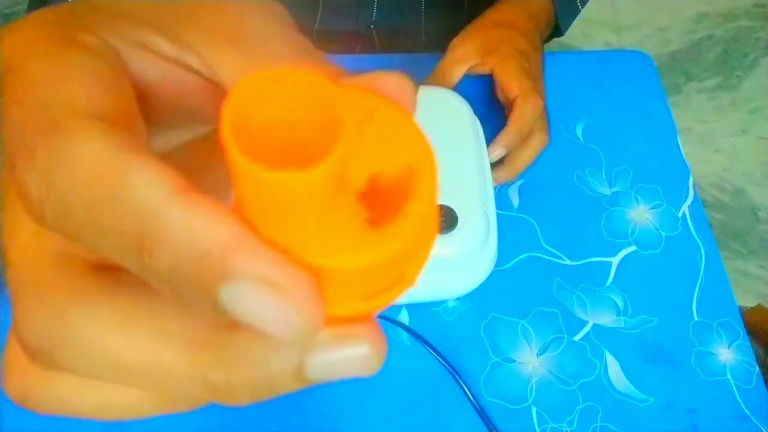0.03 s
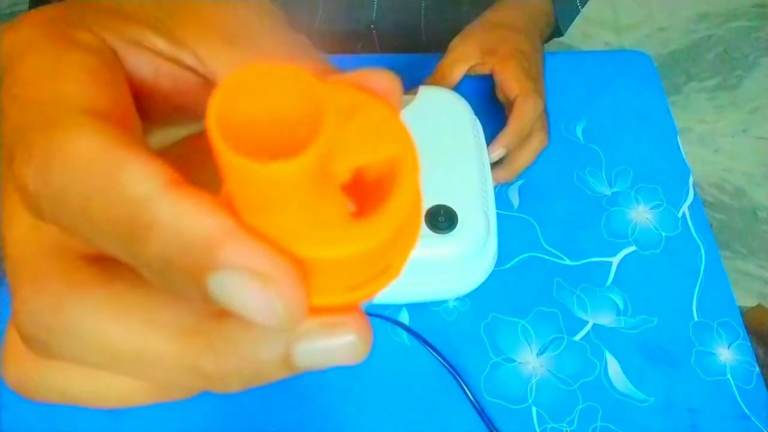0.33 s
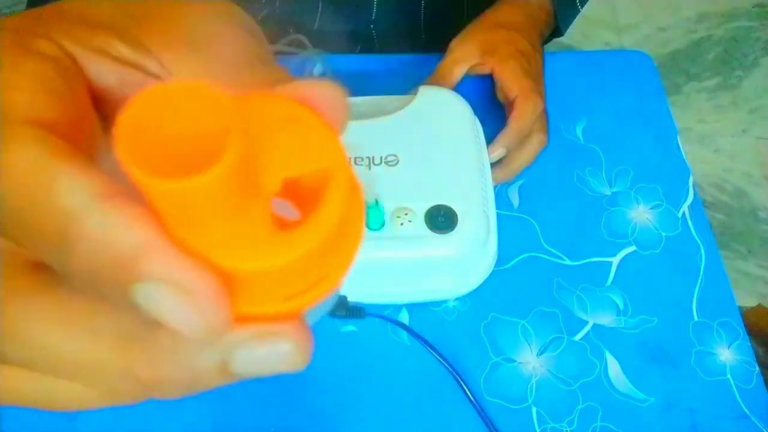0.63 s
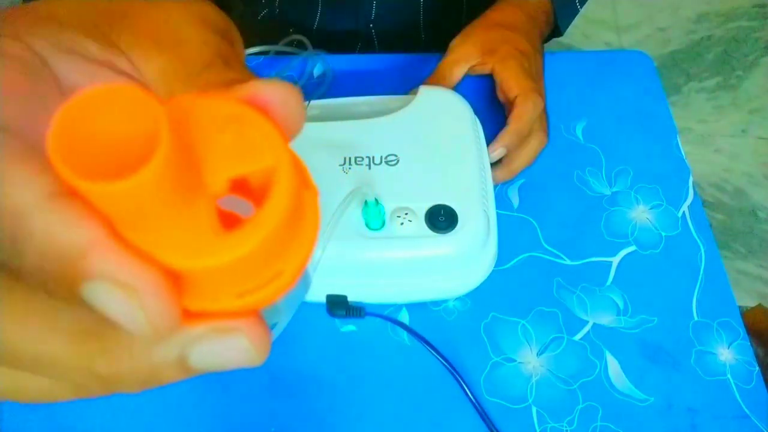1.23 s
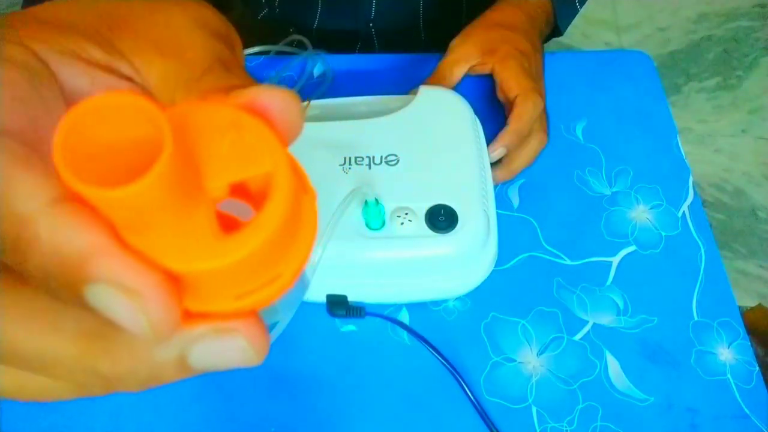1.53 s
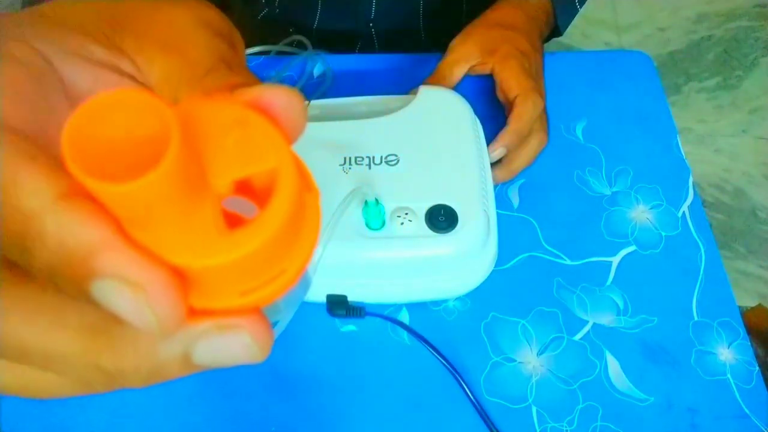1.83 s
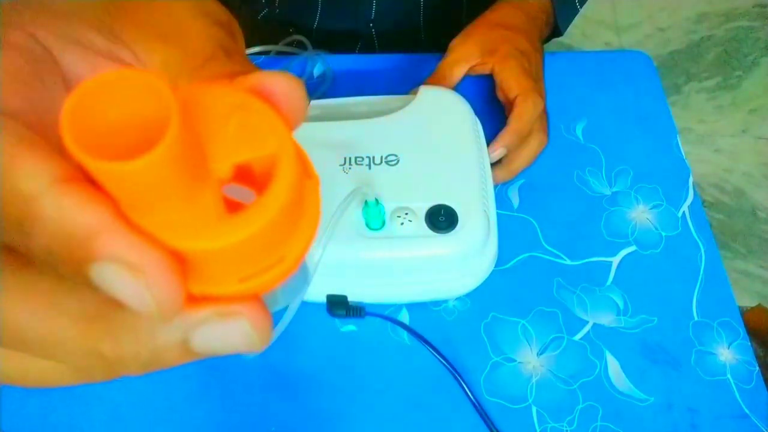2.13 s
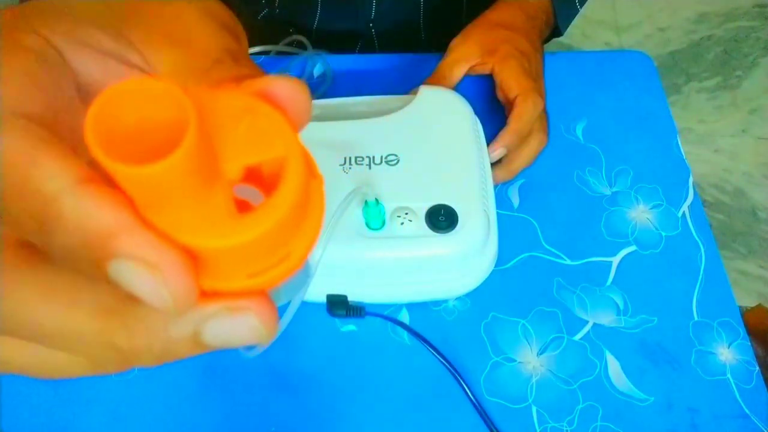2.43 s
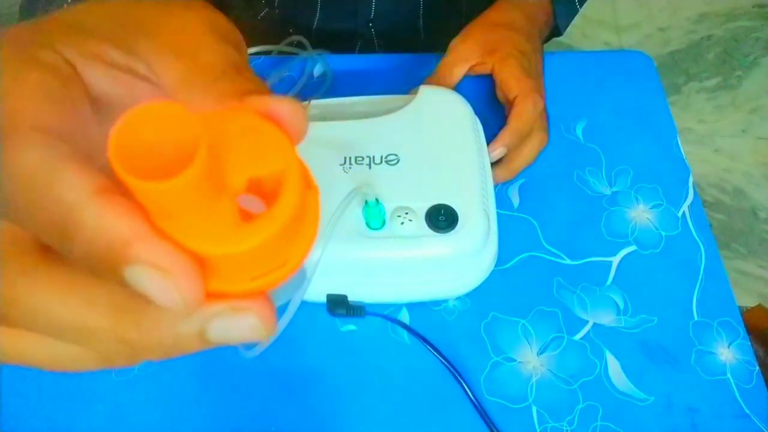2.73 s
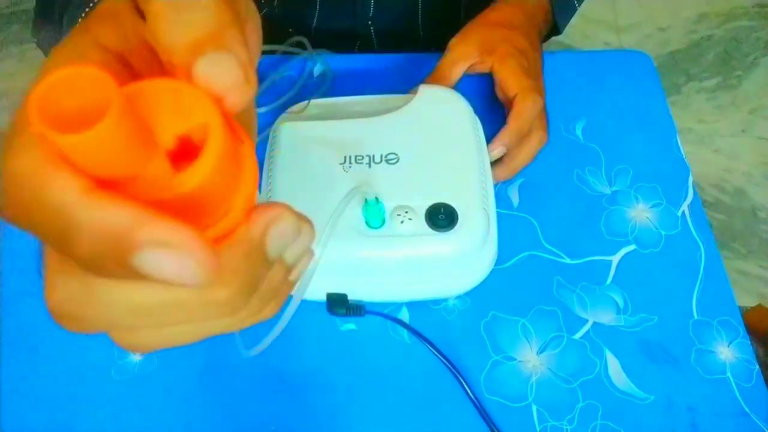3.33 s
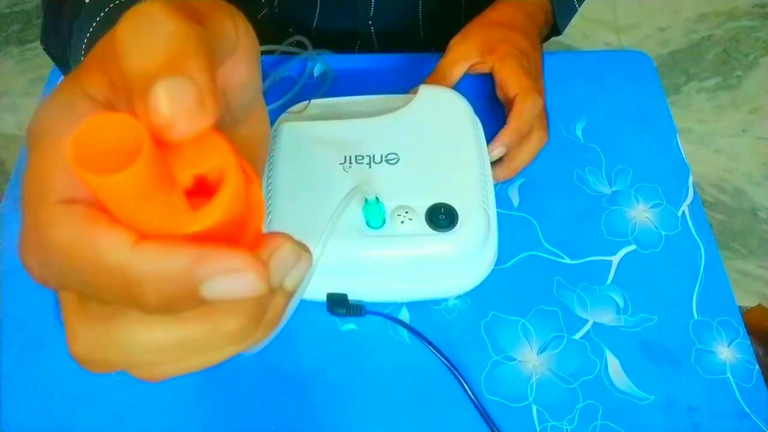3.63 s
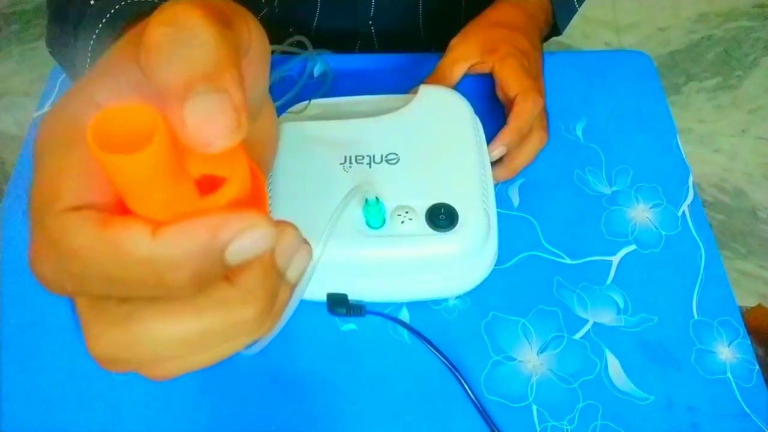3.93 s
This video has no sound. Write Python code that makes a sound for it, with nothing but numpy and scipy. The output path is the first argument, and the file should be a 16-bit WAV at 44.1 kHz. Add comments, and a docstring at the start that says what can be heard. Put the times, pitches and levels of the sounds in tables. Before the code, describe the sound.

Steady rattling drone of a small nebulizer pump, with air hissing thinly through its cup.

```python
"""A fast, rattling knock over a motor drone: a nebulizer's small piston compressor on a table indoors.
The pump chugs once in every turn of the shaft, a double knock that rings its plastic case, while the
motor hums and its fan rushes. Air hisses and whistles through the jet of the medicine cup, which a hand
holds close and slowly tilts, shifting the colour of the hiss."""
import sys
import numpy as np
from scipy import signal
from scipy.fft import rfft, irfft
from scipy.io import wavfile
from scipy.ndimage import uniform_filter1d

SR = 44100
rng = np.random.default_rng(int(sys.argv[2]) if len(sys.argv) > 2 else 0)


def unload_audio(sound):
    """Save the sound as a 16-bit wav file, at the path given as the first command line argument."""
    columns = np.transpose(np.atleast_2d(sound))
    # keep every value between -1 and 1, then stretch to whole-number steps
    steps = np.round(np.clip(columns, -1, 1) * 32767)
    wavfile.write(sys.argv[1], SR, steps.astype(np.int16))


N = 176400
TIME = np.arange(N) / SR
SHAFT_HZ, WHISTLE_HZ = 45.157, 4870

# the hand's move with the cup: time_s, tilt (0 upright, 1 tilted), hiss_db
CUP_MOVE = [(0, 0, -1), (0.499, 0, -2.5), (1.001, 0.04, -1.5), (1.5, 0.1, -3), (2, 0.31, -2.5),
            (2.351, 0.52, -2.5), (2.7, 0.8, -2.5), (3, 0.97, -4), (3.299, .95, -1.5), (3.6, 1, -3.5),
            (4, 0.6, -6)]
# rise and fall of the cup's main whistle and the hiss around it: time_s, gain_db
WHISTLE_RIDE = [(0, 0), (1.1, 1), (1.8, -1.5), (2.3, -3.5), (2.75, -5.5), (2.92, 2.5), (3.3, -0.5),
                (3.5, -4.5), (3.8, -1.5), (4, -3)]


def amp(db):
    """Decibels to gain."""
    return 10 ** (np.asarray(db) / 20)


def unit(x):
    """Scales to rms 1."""
    return x / np.sqrt(np.mean(abs(x) ** 2) + 1e-20)


def eq_db(curve, hz):
    """Level of an EQ curve at hz, on a log-frequency axis."""
    freq_hz, db = np.transpose(curve)
    return np.interp(np.log(hz + 1), np.log(freq_hz), db)


def wander(hz):
    """Smooth random modulation of rms 1, rolling off above hz."""
    freq_hz = np.fft.rfftfreq(N, 1 / SR)
    return unit(irfft(rfft(rng.standard_normal(N)) / np.sqrt(1 + (freq_hz / hz) ** 4), N))


def eq_impulse(curve, size=4096):
    """Minimum-phase impulse response of an EQ curve."""
    log_gain = np.log(amp(eq_db(curve, abs(np.fft.fftfreq(size, 1 / SR)))))
    return np.fft.ifft(np.exp(np.conj(signal.hilbert(log_gain)))).real[:size // 2]


def clicks(times, gains):
    """A train of one-sample clicks."""
    at = np.round(times * SR).astype(int)
    inside = (at >= 0) & (at < N)
    return np.bincount(at[inside], gains[inside], N)


def pump_rhythm():
    """One chug a turn: the pump holds its beat for a short run, then slips to another place in the turn."""
    # runs of steady chugs: start_s, level_db
    runs = [(0.009, -3.7), (0.0574, -3.4), (0.0878, -4.0), (0.1723, 0.5), (0.2263, 0.6), (0.3314, -0.3),
            (0.4145, -0.6), (0.4768, -2.7), (0.4934, 2.1), (0.5875, 1.0), (0.773, -1.9), (0.9363, 0.6),
            (1.0304, 1.3), (1.1674, -3.0), (1.3986, 1.3), (1.4761, 2.3), (1.5383, 1.8), (1.6601, 1.6),
            (1.7598, 0.9), (1.8221, -4.7), (1.8387, -1.7), (1.9674, -0.5), (1.9854, -0.8), (2.0241, -0.8),
            (2.1183, -0.6), (2.247, 0.9), (2.3079, 1.2), (2.3798, 0.8), (2.5362, -0.4), (2.7452, -0.1),
            (2.8615, 0.4), (3.0041, -1.5), (3.1881, -5.5), (3.2864, -3.4), (3.4525, -0.9), (3.5743, 0.6),
            (3.6366, -4.2), (3.6532, -0.7), (3.7501, 0.0), (3.7764, -0.4), (3.8151, -1.0), (3.9106, -1.5)]
    # lags of a stray rattle behind the main knock, one picked for each run: delay_s
    stray_delays = [.0069, .0083, .0111, .0125, .0138, .0152, .018]
    # single chugs that hit harder: time_s, boost_db
    accents = [(0.273, 3.5), (0.354, 2.5), (0.376, 3), (0.46, 5), (0.54, 2.5), (0.634, 7), (1.077, 2),
               (1.26, 2), (1.445, 4), (1.706, 2), (2.33, 1.5), (2.426, 3)]
    turn_s = 1 / SHAFT_HZ
    chugs = []
    for (start, db), (end, _) in zip(runs, runs[1:] + [(N / SR + turn_s, 0)]):
        stray_s = rng.choice(stray_delays)
        chugs += [(at, db, stray_s) for at in np.arange(start, end - turn_s / 2, turn_s)]
    chug_s, chug_db, stray_s = np.transpose(chugs)
    for at, boost_db in accents:
        chug_db[np.argmin(abs(chug_s - at))] += boost_db
    return chug_s, chug_db, stray_s


def case_ring(size=4096):
    """The plastic case answers a knock with a short pulse that swells and dies, treble slightly late."""
    # colour of the case: freq_hz, level_db
    case_eq = [(40, -60), (90, -55), (135, -33.5), (180, -20.5), (226, -12), (271, -16), (318, 1.5),
               (361, -8), (406, -3.5), (452, 4), (497, 1.5), (542, -1), (587, -8), (632, -13), (680, 3),
               (722, -6.5), (768, -19.5), (830, -21.5), (903, -12.5), (948, -6), (1000, -29), (1084, -11),
               (1190, -19), (1265, -26.5), (1400, -21), (1570, -32), (1725, -22), (2000, -27), (2160, -28),
               (3000, -39.5), (6000, -42), (12000, -70.5)]
    smear_s_per_hz, on_time_hz = 7e-7, 722
    hz = np.fft.rfftfreq(size, 1 / SR)
    smear = np.exp(-1j * np.pi * smear_s_per_hz * (hz - on_time_hz) ** 2)
    return np.fft.fftshift(irfft(amp(eq_db(case_eq, hz)) * smear))


def pump_knocks(chug_s, chug_db, stray_s):
    """Each chug is a double knock with lighter rattles around it; together they ring the case."""
    # hits of one chug, timed from its main knock: offset_s, level_db
    hits = [(-.00554, -11), (0, 0), (.00415, -1), (.00554, -9), (.0097, -10)]
    stray_db, jitter_s, uneven_db = -10, .00005, 1.3
    train = np.zeros(N)
    for offset_s, hit_db in hits + [(stray_s, stray_db)]:
        late, force = rng.standard_normal((len(chug_s), 2)).T
        gains = amp(chug_db + hit_db + uneven_db * np.tanh(force))
        train += clicks(chug_s + offset_s + jitter_s * late, gains)
    return amp(-46.2) * unit(signal.oaconvolve(train, case_ring(), "same"))


def airflow(chug_s, width_s=.005):
    """Swell of the pumped air, from -1 to 1, cresting just after each main knock."""
    nearest_s = chug_s[np.searchsorted((chug_s[1:] + chug_s[:-1]) / 2, TIME)]
    return 2 * np.exp(-((TIME - nearest_s - width_s / 2) / width_s) ** 2) - 1


def motor_drone(waver_hz=5.6):
    """Harmonics of the shaft speed, each part steady and part wavering."""
    # partials of the motor: shaft_harmonic, level_db, waver (0 steady, 1 all wavering)
    partials = [(5, -68, 0.4), (7, -61, 1), (11, -57, 0.8), (12, -55, 0.47), (21, -62.5, 1),
                (26, -72.5, 0.4), (27, -68.5, 0.6)]
    drone = np.zeros(N)
    for harmonic, db, waver in partials:
        drift = unit(wander(waver_hz) + 1j * wander(waver_hz))
        tone = np.exp(2j * np.pi * (harmonic * SHAFT_HZ * TIME + rng.random()))
        modulation = np.sqrt(1 - waver ** 2) + waver * drift
        drone += amp(db) * unit((modulation * tone).real)
    return drone


def motor_hum(harmonic=16, throb_hz=11.15, throb_db=4):
    """The motor's firm main tone, locked to the shaft speed and throbbing."""
    throb = amp(throb_db * np.sin(2 * np.pi * (throb_hz * TIME + rng.random())))
    return amp(-50.5) * unit(-throb * np.cos(2 * np.pi * harmonic * SHAFT_HZ * TIME))


def fan_rush(swell, pulse_db=1, flutter_db=1.46):
    """Fluttering air noise of the motor and its fan, pulsing with the pump."""
    # colour of the rush: freq_hz, level_db
    rush_eq = [(25, -41), (70, -41.5), (100, -37), (140, -22.5), (185, -2.5), (300, 5), (560, 3.5),
               (750, 4.5), (840, -8.5), (1000, -1), (1230, -4.5), (1400, -14), (1570, -11), (1725, -8.5),
               (2000, -13.5), (2160, -11), (3000, -25), (5000, -36.5), (12000, -67)]
    air = rng.standard_normal(N) * amp(pulse_db * swell + flutter_db * wander(hz=26))
    return amp(-49.5) * unit(signal.oaconvolve(air, eq_impulse(rush_eq))[:N])


def bell(hz, centre_hz, width_hz):
    """A bell-shaped EQ band of height 1, as a column over frequency."""
    return np.exp(-2 * ((hz[:, None] - centre_hz) / width_hz) ** 2)


def jet_hiss(shimmer_db=2, sputter_db=1.33):
    """The air jet hisses through the cup, whose resonances change in strength as it tilts."""
    # colour of the bare jet: freq_hz, level_db
    jet_eq = [(500, -38.5), (2000, -18), (3000, -10), (4500, 1.5), (5200, -7), (5750, -11.5), (6600, -9),
              (7000, -10.5), (7700, -18), (8150, -27.5), (9300, -31), (11500, -35.5), (15000, -40)]
    # resonances of the cup: centre_hz, width_hz, upright_db, tilted_db
    resonances = [(3562, 52, 13, 2.5), (4135, 210, 1.5, 8.5), (4755, 150, 10.5, 4), (6900, 210, -4, -4),
                  (5230, 160, 6, 4.5), (6180, 430, 4, 4.5), (7500, 670, 1, -6), (8590, 400, 4.5, 9.5),
                  (10550, 490, 5, 4)]
    hz, frame_s, noise = signal.stft(rng.standard_normal(N), SR, nperseg=1024, noverlap=768)
    move_s, tilts, hiss_db = np.transpose(CUP_MOVE)
    tilt = np.interp(frame_s, move_s, tilts)
    colour_db = eq_db(jet_eq, hz)[:, None] + np.interp(frame_s, move_s, hiss_db)
    for centre_hz, width_hz, upright_db, tilted_db in resonances:
        colour_db += bell(hz, centre_hz, width_hz) * (upright_db + (tilted_db - upright_db) * tilt)
    colour_db += bell(hz, WHISTLE_HZ, width_hz=170) * np.interp(frame_s, *np.transpose(WHISTLE_RIDE))
    # small random patches of the spectrum brighten and fade
    patches = uniform_filter1d(rng.standard_normal(noise.shape), size=4, axis=0)
    colour_db += shimmer_db * unit(uniform_filter1d(patches, size=16, axis=1))
    hiss = signal.istft(noise * amp(colour_db), nperseg=1024, noverlap=768)[1][:N]
    return amp(-59.5) * unit(hiss * amp(sputter_db * wander(hz=49.6)))


def warble(hz, swing_hz, level_db, flicker_db=4.5, rough_db=3.5):
    """A thin, rough tone that slides about its pitch and breaks into short flickers."""
    pitch_hz = hz + swing_hz * wander(hz=13)
    flicker = amp(flicker_db * np.tanh(wander(hz=35)) + rough_db * wander(hz=110))
    return amp(level_db) * unit(flicker * np.sin(2 * np.pi * np.cumsum(pitch_hz) / SR))


def cup_whistles(swing_hz=38, tilt_swing_hz=20):
    """Air sounds three whistles in the cup; tilting lifts the low one and makes it and the main waver more."""
    # faint high whistle that sinks as the cup tilts: time_s, pitch_hz, level_db
    high_line = [(0, 5376, -81.5), (2.1, 5350, -76), (2.5, 5286, -69.5), (2.8, 5220, -69), (3.1, 5170, -85),
                 (3.5, 5340, -69.5), (4, 5320, -71)]
    move_s, tilts, _ = np.transpose(CUP_MOVE)
    tilt = np.interp(TIME, move_s, tilts)
    wide_swing_hz = swing_hz + tilt_swing_hz * tilt
    ride_db = np.interp(TIME, *np.transpose(WHISTLE_RIDE))
    main = warble(WHISTLE_HZ, wide_swing_hz, level_db=-62.5 + ride_db)
    high_s, high_hz, high_db = np.transpose(high_line)
    high = warble(np.interp(TIME, high_s, high_hz), swing_hz, np.interp(TIME, high_s, high_db))
    low = warble(hz=4170, swing_hz=wide_swing_hz, level_db=-71 + 6.5 * tilt)
    return main + high + low


def room(x, wet_db=-19, t60_s=.2, predelay_s=.006):
    """Adds a short diffuse tail from the table and walls."""
    t = TIME[:SR // 2]
    tail = rng.standard_normal(len(t)) * (t > predelay_s) * 1000 ** (-t / t60_s)
    return x + amp(wet_db) * signal.oaconvolve(x, tail / np.linalg.norm(tail))[:N]


def scene():
    """Mono mix: knocks with a touch of room, the motor pulsing under them, the cup close and dry."""
    # fader ride on the motor and fan: time_s, gain_db
    motor_ride = [(0, 1.5), (.2, -0.5), (.6, 1.5), (.9, 1.9), (1.1, 2.5), (1.45, 2.8), (1.7, 0.7),
                  (2, -0.8), (2.35, 0.5), (2.7, 0.9), (3.1, 0.4), (3.5, 1), (4, 2)]
    pulse_db = 2.5
    chug_s, chug_db, stray_s = pump_rhythm()
    swell = airflow(chug_s)
    tones = (motor_drone() + motor_hum()) * unit(amp(pulse_db * swell))
    motor = (tones + fan_rush(swell)) * amp(np.interp(TIME, *np.transpose(motor_ride)))
    knocks = room(pump_knocks(chug_s, chug_db, stray_s))
    return (knocks + motor + jet_hiss() + cup_whistles())[None]


def record(dry, cutoff_hz=15480):
    """A steep low-pass trims the very top of the hiss."""
    lowpass = signal.firwin(511, cutoff_hz, window=("kaiser", 9), fs=SR)
    return signal.oaconvolve(dry, lowpass[None], "same")


dry = scene()
out = record(dry)
unload_audio(out)
```